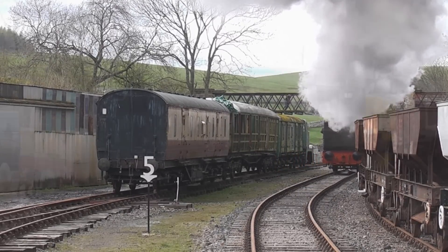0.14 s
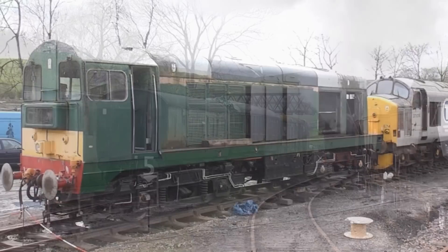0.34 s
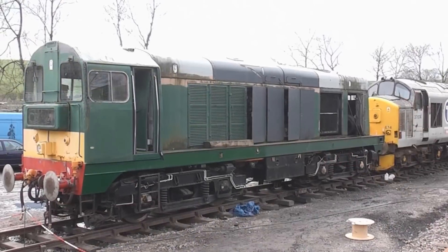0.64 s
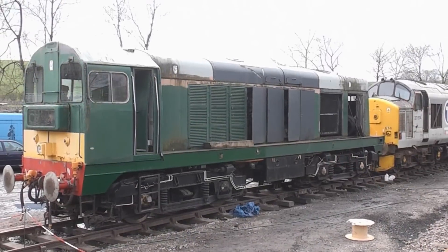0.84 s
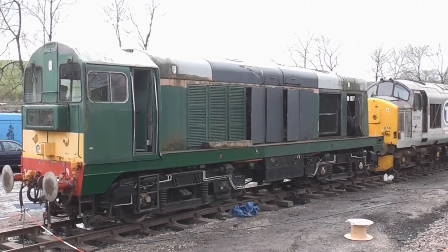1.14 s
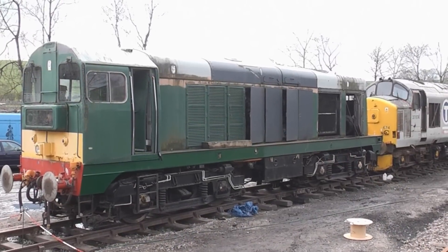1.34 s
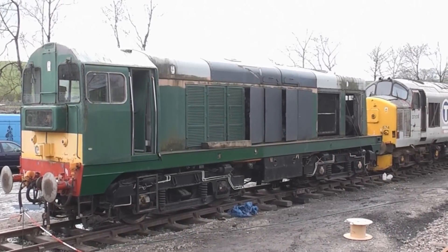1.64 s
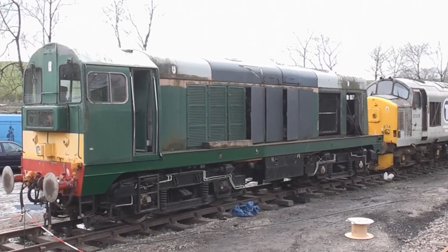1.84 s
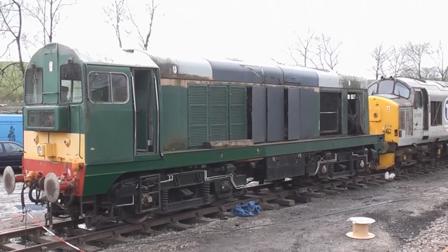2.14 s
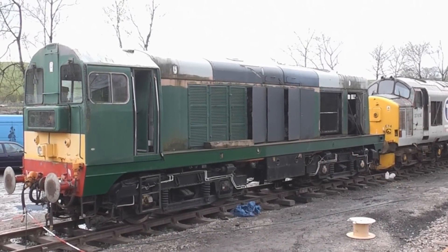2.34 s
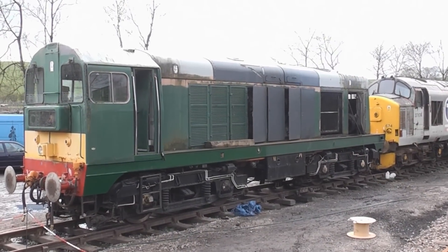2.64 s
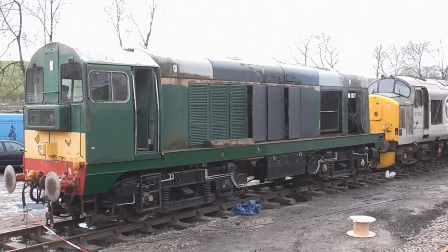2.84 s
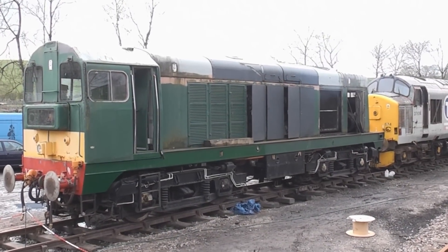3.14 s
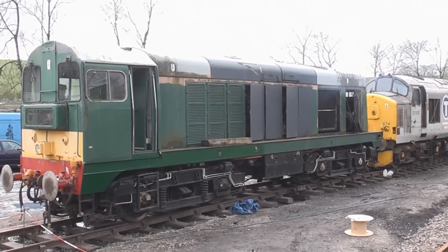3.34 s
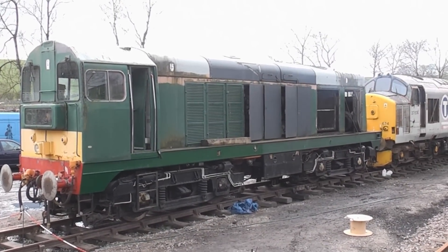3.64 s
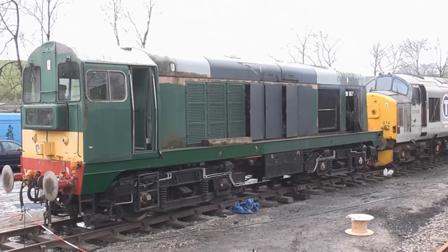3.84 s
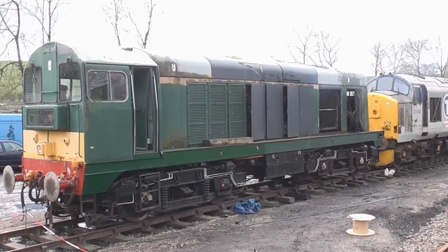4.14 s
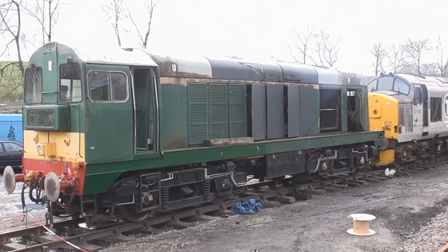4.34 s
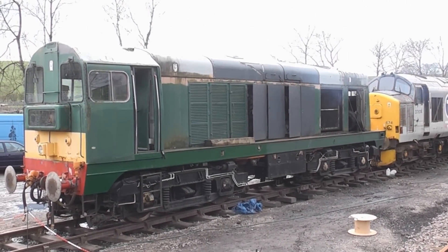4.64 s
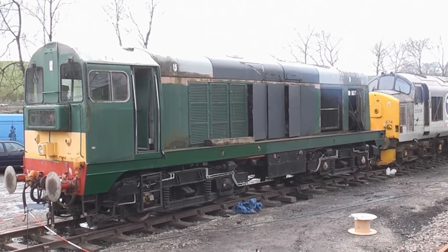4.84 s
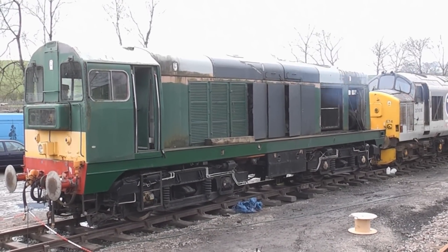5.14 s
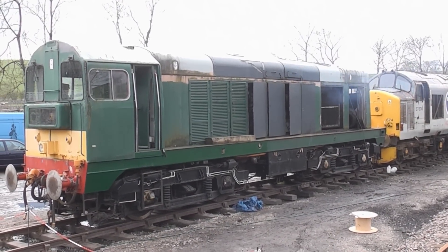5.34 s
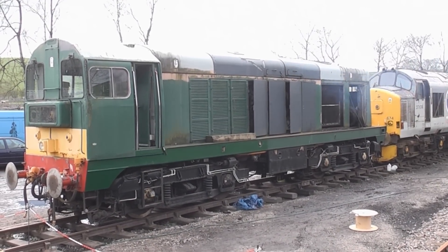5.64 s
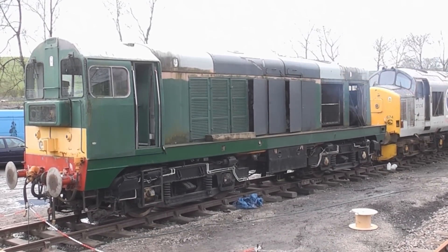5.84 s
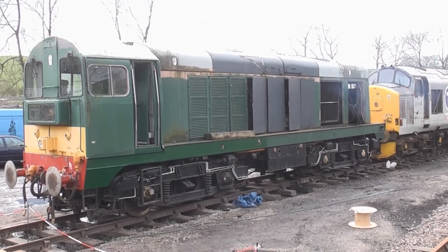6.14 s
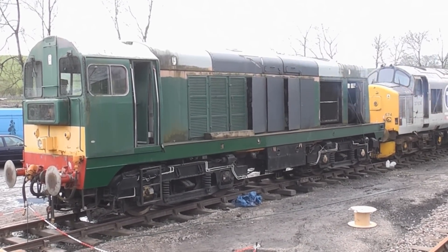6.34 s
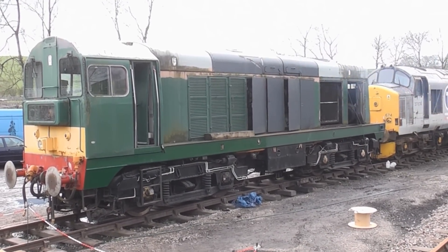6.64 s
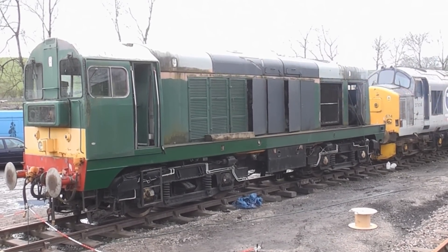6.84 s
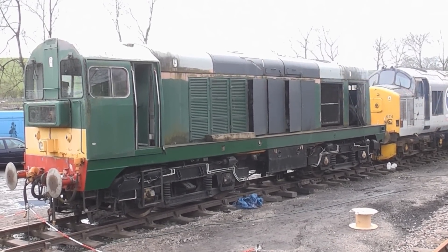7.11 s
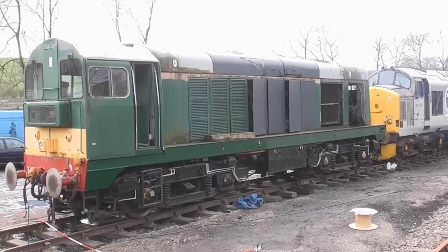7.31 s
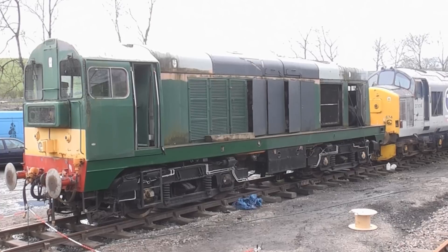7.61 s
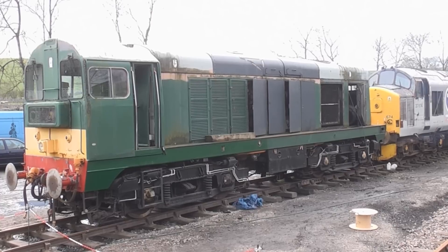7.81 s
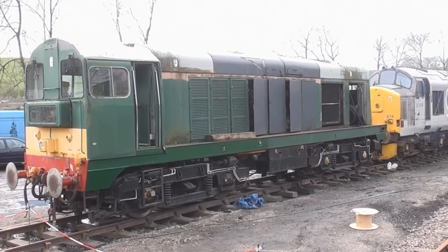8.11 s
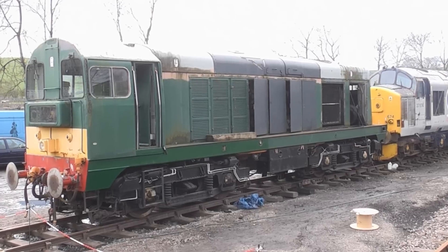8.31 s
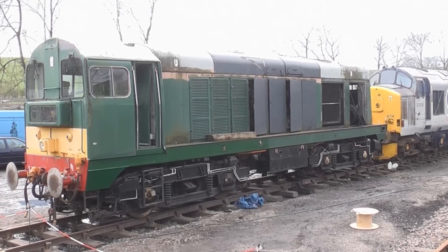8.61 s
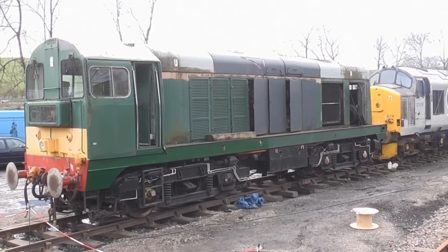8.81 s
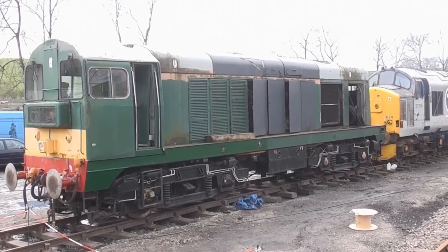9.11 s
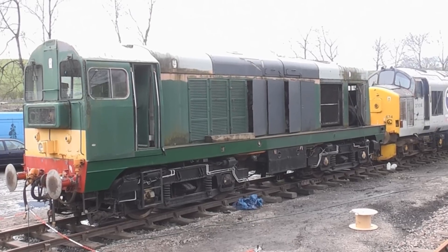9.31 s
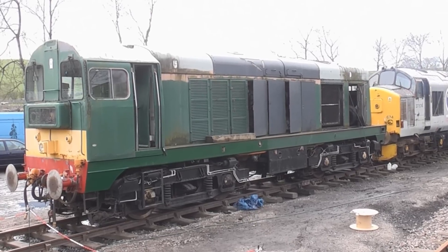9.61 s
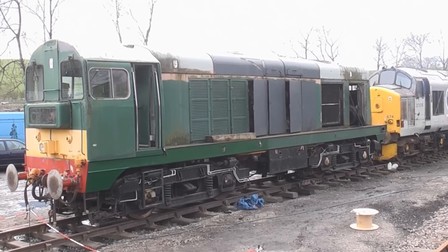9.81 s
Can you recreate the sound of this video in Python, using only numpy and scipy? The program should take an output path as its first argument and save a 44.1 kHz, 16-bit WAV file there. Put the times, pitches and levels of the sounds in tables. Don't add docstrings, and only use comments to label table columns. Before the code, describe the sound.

In an open railway yard, wagon wheels rumble loudly for about half a second and crossfade into a large diesel locomotive idling close by. A hollow engine roar carries quick, uneven exhaust thuds and rougher metallic knocks, about four cycles a second. Above it a high turbocharger whistle flutters with each gas pulse. After two seconds the whistle swings left and throbs more deeply. Small stereo camera microphone.

```python
import sys
import numpy as np
from scipy import signal
from scipy.fft import rfft, irfft, next_fast_len
from scipy.io import wavfile
from scipy.ndimage import uniform_filter1d, map_coordinates

SR = 44100
rng = np.random.default_rng(int(sys.argv[2]) if len(sys.argv) > 2 else 0)


def generate_wav(signal):
    frames = np.transpose(np.atleast_2d(signal))
    scaled = np.clip(frames, -1, 1) * 32767
    pcm = np.round(scaled).astype(np.int16)
    wavfile.write(sys.argv[1], SR, pcm)


def undo_db(level):
    steps = np.asarray(level, float) / 20
    return 10 ** steps


N = 439677
T = np.arange(N) / SR
CYCLE_HZ = 3.909
CYCLES = round(N / SR * CYCLE_HZ)


def unit(x):
    return x / np.sqrt(np.mean(x ** 2) + 1e-20)


def along(points, hz):
    f, v = np.transpose(points)
    return np.interp(np.log(hz + 1), np.log(f + 1), v)


def wobble(rate):
    return map_coordinates(rng.standard_normal(int(N * rate / SR) + 4), [T * rate])


def ramp(start_s, end_s):
    return np.sin(np.pi / 2 * np.clip((T - start_s) / (end_s - start_s), 0, 1)) ** 2


def filtered(x, response):
    m = next_fast_len(N + SR // 2)
    return irfft(rfft(x, m) * response(np.fft.rfftfreq(m, 1 / SR)), m)[..., :N]


def modes(table):
    def response(f):
        return sum((-1) ** k * undo_db(db) * 1j * f * w / (c * c - f * f + 1j * f * w)
                   for k, (c, w, db) in enumerate(table))
    return response


def rush(response, alike, patchy_db):
    z = signal.stft(rng.standard_normal((2, N)), nperseg=512)[2]
    field = uniform_filter1d(rng.standard_normal(z.shape[1:]), size=8, axis=0)
    field = uniform_filter1d(field, size=14, axis=1)
    pair = signal.istft(z * undo_db(patchy_db * unit(field)), nperseg=512)[1][:, :N]

    def mid_side(hz):
        turn = np.arccos(np.clip(along(alike, hz), -1, 1)) / 2
        return response(hz) * [np.cos(turn), np.sin(turn)]
    mid, side = filtered(pair, mid_side)
    return unit(np.array([mid + side, mid - side]))


def train():
    # frequency in Hz, density in dB per Hz.
    rumble = [(18, -64.5), (30, -35), (81, -4.5), (300, -0.5), (374, 1.5), (437, -5.5), (485, -2),
              (1970, -15), (3070, -24), (5170, -28), (15000, -52)]
    # frequency in Hz, left-right likeness from 0 to 1.
    rumble_alike = [(60, 0.99), (240, 1), (950, 0.74), (3770, 0.62), (15000, 0.59)]
    flutter_db = -13.5 + 0.63 * wobble(21.4)
    return undo_db(flutter_db) * rush(lambda hz: undo_db(along(rumble, hz)), rumble_alike, patchy_db=1.6)


def crank():
    late_cycles, catch_up_s = .083, 1.65
    return CYCLE_HZ * T - late_cycles * np.exp(-(T / catch_up_s) ** 2)


def engine_room(roar_db, over_level):
    # frequency in Hz, density in dB per Hz.
    roar_colour = [(25, -46), (55, -37), (85, -11), (160, -7), (250, -3.5), (420, -10), (600, -4),
                   (800, -10.5), (1050, -15.5), (2300, -21), (2900, -17), (4500, -24), (10400, -28.5),
                   (15700, -43.5)]
    # frequency in Hz, width in Hz, gain in dB.
    hollows = [(1134, 32.23, 3), (1468, 143, 5.5), (1950, 140, 6), (2575, 117, 6), (2815, 46, -3)]
    # frequency in Hz, left-right likeness from 0 to 1.
    roar_alike = [(40, .3), (90, .82), (200, .95), (600, .96), (1400, .82), (3000, .75), (6000, .75),
                  (9500, .68), (15000, .45)]

    def colour(hz):
        bumps_db = sum(db * np.exp(-((hz - c) / w) ** 2) for c, w, db in hollows)
        bounce = 0.2 * np.exp(-2j * np.pi * hz * 0.00099) * (hz > 6000) * (hz < 12600)
        return undo_db(along(roar_colour, hz) + bumps_db) * np.abs(1 + bounce)
    roar = rush(colour, roar_alike, patchy_db=0.85)
    high = filtered(roar, lambda hz: 1 / (1 + (3600 / (hz + 1)) ** 6))
    hiss_db = -38 - 6.5 * np.exp(-T / 0.37)
    flow_db = hiss_db - roar_db + 17 + 0.18 * wobble(2.99) + 0.48 * wobble(9)
    flow = undo_db(flow_db) * (1.01 + 0.11 * over_level)
    return undo_db(1) * (roar - high + flow * high)


def shafts():
    # multiple of the firing cycle, level in dB.
    hum = [(12, -47.5), (16, -52), (21, -42.5), (24, -52), (31.5, -43), (47, -42.5), (57, -52), (63.6, -38),
           (72.5, -43), (81, -37.5), (129.5, -37.5), (143.8, -31), (184, -41.5), (196, -41.5)]
    return sum(np.sqrt(2) * undo_db(db + 1.1 * wobble(3.03))
               * np.sin(2 * np.pi * k * crank() + .4 * wobble(2.004)) for k, db in hum)


def knocks(table, body, scatter_db, rough):
    place, db = np.transpose(table)
    cycles = (np.arange(1, CYCLES)[:, None] - 1.015 + place).ravel()
    at = (np.interp(cycles, crank(), T) * SR).astype(int)
    size = undo_db(np.resize(db, len(at)) + scatter_db * rng.standard_normal(len(at)))
    blows = np.bincount(at, size, N)
    decay = np.exp(-np.arange(1300) / SR / 0.0091)
    burst = signal.fftconvolve(blows, decay)[:N] * rng.standard_normal(N)
    ring = unit(filtered(blows, modes(body)))
    return unit((1 - rough) * ring + rough * unit(filtered(burst, modes(body))))


def exhaust():
    # place in the cycle from 0 to 1, level in dB.
    blows = [
        (0.089, -4.9),
        (0.318, -2.1),
        (0.547, 0.0),
        (0.661, -6.3),
        (0.859, -2.5),
        (0.984, -4.4),
    ]
    # frequency in Hz, width in Hz, level in dB.
    pipe = [(147, 37, -8), (245.4, 27.6, 4), (328, 37, -10)]
    return knocks(blows, pipe, scatter_db=2.0, rough=0.15)


def block():
    # place in the cycle from 0 to 1, level in dB.
    blows = [(0.068, -4.0), (0.172, -3.9), (0.328, 0.0), (0.411, -3.0), (0.505, -3.4), (0.599, -3.6),
             (0.891, -3.0)]
    # frequency in Hz, width in Hz, level in dB.
    casing = [(500, 56, -13), (631, 70, -8), (710, 95, -6.5), (1523, 28, -9)]
    return knocks(blows, casing, scatter_db=1.5, rough=0.56)


def throb(table, turned, rest_db, scatter_db, scatter_hz, step):
    t, turned = T[::32], turned[::32]
    place, length, hz, *db = np.transpose(table)[..., None]
    since = crank()[::32] - place
    cycle = np.round(since).astype(int)
    rows = np.arange(len(table))[:, None]
    chance = rng.standard_normal((CYCLES + 3, len(table), 2))[cycle + 1, rows]
    size = undo_db(db[-1] + (db[0] - db[-1]) * turned + scatter_db * chance[..., 0])
    reach = (since - cycle) / (length * (1.04 - .04 * turned))
    swell = size * np.cos(np.pi * np.clip(reach, -.5, .5))
    side = step * (.45 + .55 * turned) * (-1) ** rows
    wave = (swell * np.exp(1j * side)).sum(axis=0) + undo_db(rest_db)
    bend_hz = (swell * (hz + scatter_hz * chance[..., 1])).sum(axis=0) / (swell.sum(axis=0) + undo_db(rest_db))
    bend_hz += np.gradient(np.angle(wave), t) / (2 * np.pi)
    level, bend_hz = uniform_filter1d([np.abs(wave), bend_hz], size=3, axis=1)
    return unit(np.interp(T, t, level)), np.interp(T, t, bend_hz)


def whistle(hz, level, blur, rough):
    spin = np.exp(2j * np.pi * np.cumsum(hz) / SR + 1j * blur * wobble(30))
    hiss = np.array([wobble(130) + 1j * wobble(130) for port in "LR"])
    return unit(np.real(spin * (level * undo_db(1.3 * wobble(30)) + rough * hiss)))


def turbos():
    # place in the cycle from 0 to 1, length in cycles, pitch shift in Hz,
    # level in dB after the camera turns, level in dB before.
    first_swells = [(.085, 0.086, 14.5, -2, -0.3), (.218, 0.14, -2.5, 0.8, -4.5),
                    (.328, 0.088, -9, -6, -8.5), (.406, 0.079, -2, -4.5, -9.5),
                    (.487, 0.079, 1.5, -2.5, -3), (.578, 0.088, 3.5, -1.3, -0.5), (.72, .17, 14, -2.5, -5),
                    (.828, 0.0777, 0.5, -8, -13.5), (.912, 0.104, 8.5, -3, -8.5),
                    (.995, 0.1162, -6, -3, -12)]
    # place in the cycle, length in cycles, pitch shift in Hz, level in dB.
    second_swells = [(.023, 0.1126, -6, -2), (.188, 0.1148, 0.5, 0.5), (.289, .08, -20, -3.5),
                     (.43, 0.159, 5.5, -2.8), (.531, 0.0893, -6.5, -3), (.672, 0.1494, 3, -0.8),
                     (.773, .07, -15.5, -3), (.844, 0.064, -5, -6), (.93, 0.111, 5, 0.6)]
    # place in the cycle, length in cycles, pitch shift in Hz, level in dB.
    over_swells = [(.242, .07, -25, -10.5), (.336, 0.0694, -15, -2.5), (.49, .09, 15.5, -1),
                   (.6, 0.0763, -15, -7.5), (.836, 0.0698, 6, -3.5), (.99, 0.078, 2, 2.8)]
    # time in seconds, left-right level of the first whistle in dB.
    swing = [
        (0, 1),
        (1, -2.1),
        (2.1, -3),
        (2.8, 5.5),
        (3.7, 3),
        (5, 2),
        (8.2, -2),
        (10, 1.5),
    ]
    pan_db = np.interp(T, *np.transpose(swing))
    turned = ramp(2.1, 2.8)
    level, bend_hz = throb(first_swells, turned, rest_db=-24, scatter_db=1.5, scatter_hz=5, step=.75)
    first = whistle(3083 + 30 * (1 - turned) + bend_hz, level, blur=.55, rough=.23)
    level, bend_hz = throb(second_swells, turned, rest_db=-18, scatter_db=1.5, scatter_hz=5, step=.4)
    second = whistle(2641 - 1.01 * T + bend_hz, level, blur=.65, rough=.28)
    over_level, bend_hz = throb(over_swells, turned, rest_db=-16, scatter_db=2, scatter_hz=12, step=.3)
    over_hz = 6163 + 45 * np.exp(-T / 4.5) + bend_hz
    double = whistle(over_hz, over_level, blur=1.5, rough=.15)
    triple = whistle(over_hz * 3 / 2, unit(over_level + .8), blur=2.3, rough=0.35)
    mix = first * undo_db(-19 + np.array([pan_db, -pan_db]) / 2)
    mix += undo_db(-33.5) * second + undo_db(-38.5) * double + undo_db(-45) * triple
    return mix, over_level


def diesel():
    roar_db = -22 + 0.59 * wobble(0.743)
    tones, over_level = turbos()
    body = engine_room(roar_db, over_level) + undo_db(-7.5) * exhaust() + undo_db(-11.5) * block()
    return undo_db(roar_db) * body + shafts() + tones


def at_ports(x):
    # frequency in Hz, left-right level in dB.
    balance = [(60, -1), (240, -1.5), (950, -3.0), (3770, -2), (15000, -5)]
    # frequency in Hz, radians by which left leads.
    lead = [(0, 0), (3000, -.18), (8000, -.6), (10000, -2), (15000, -2.4)]

    def ports(hz):
        return (undo_db(along(balance, hz) / 2) * np.exp(.5j * along(lead, hz))) ** [[1], [-1]]
    return filtered(x, ports)


def scene():
    leaving = undo_db(-1.5) * (1 - ramp(.28, .62)) * train()
    return leaving + undo_db(-1.5) * ramp(.15, .47) * at_ports(diesel())


def top_cut(x):
    return signal.sosfilt(signal.butter(12, 15750, fs=SR, output="sos"), x)


def record(dry):
    return top_cut(dry)


dry = scene()
out = record(dry)
generate_wav(out)
```